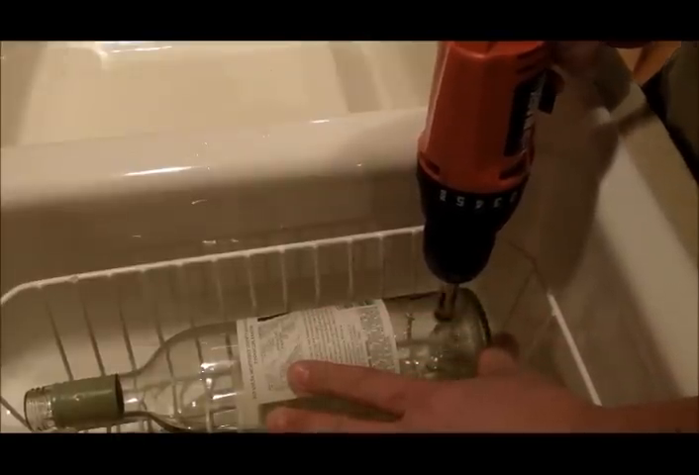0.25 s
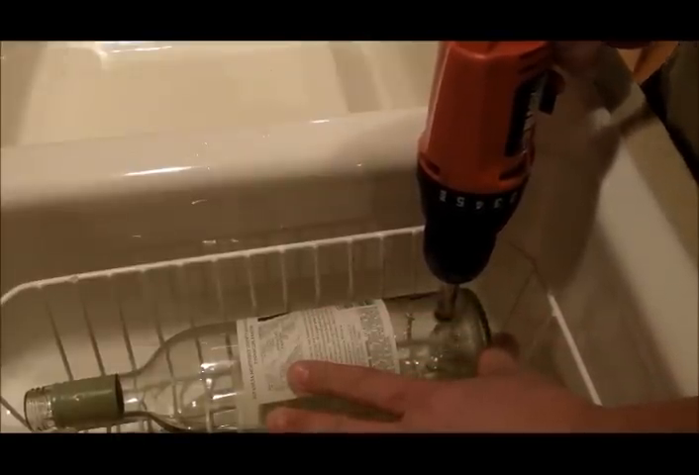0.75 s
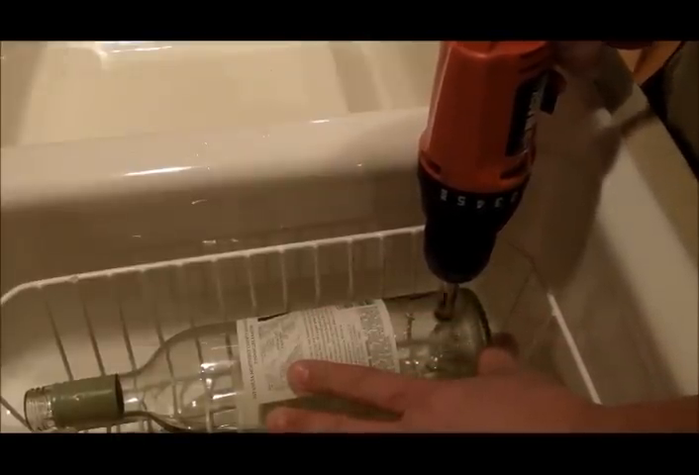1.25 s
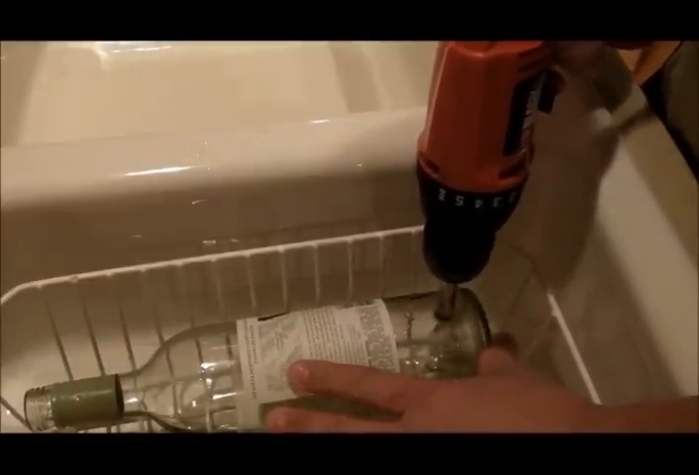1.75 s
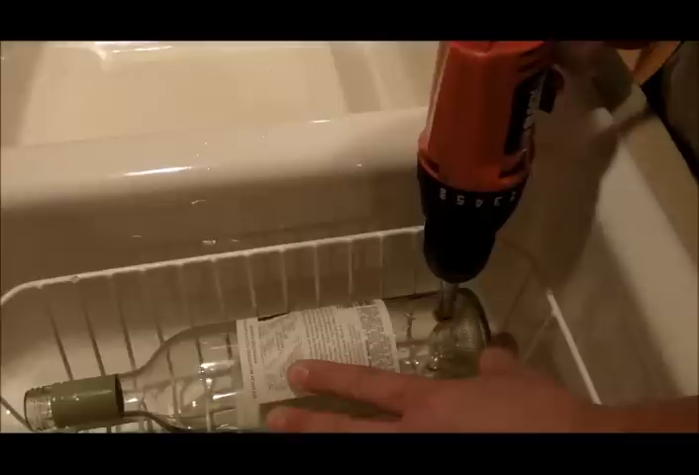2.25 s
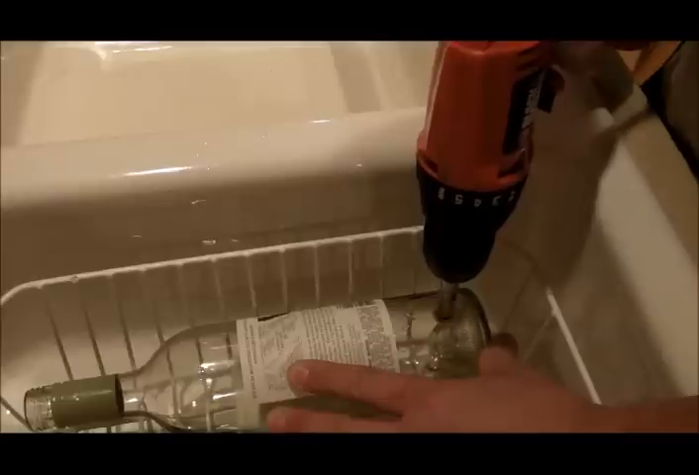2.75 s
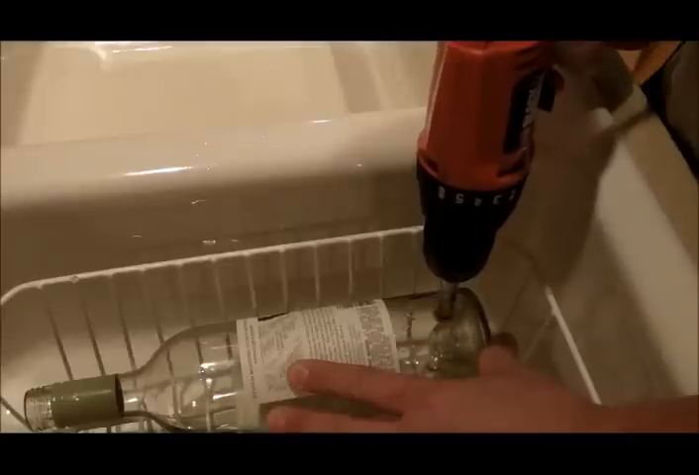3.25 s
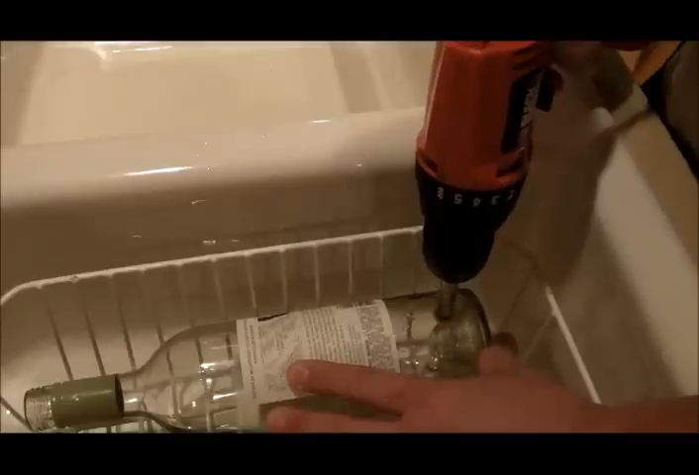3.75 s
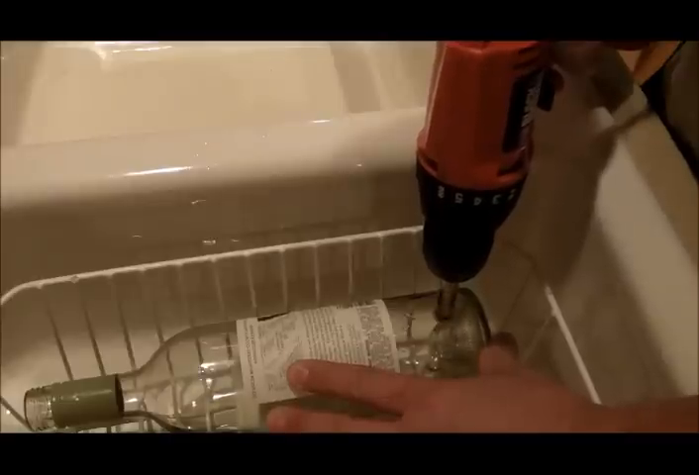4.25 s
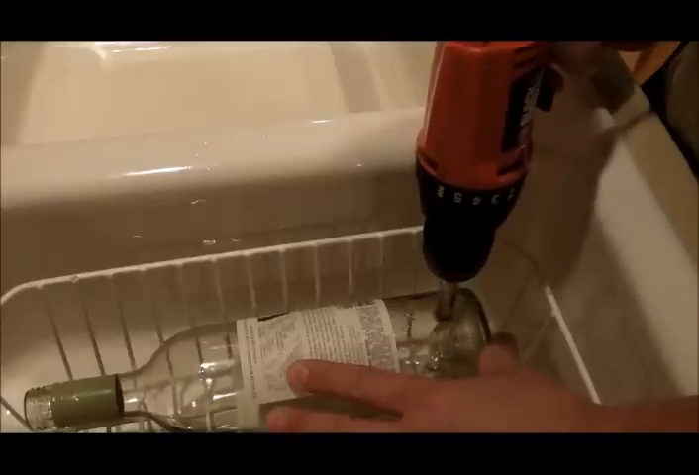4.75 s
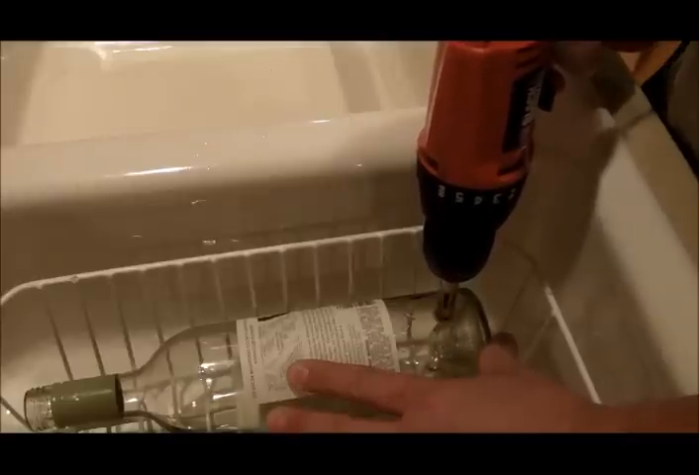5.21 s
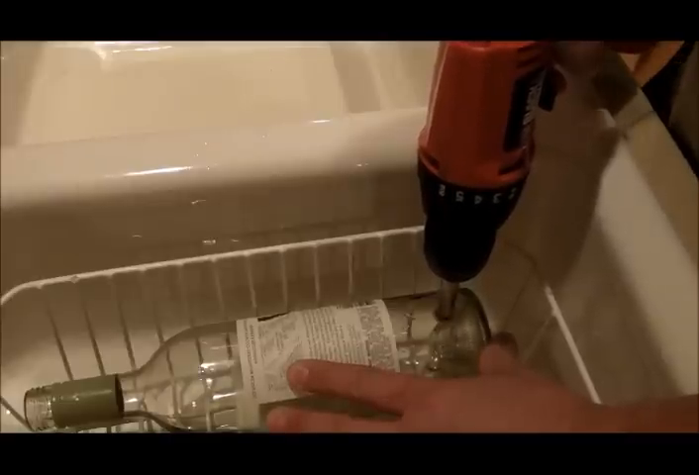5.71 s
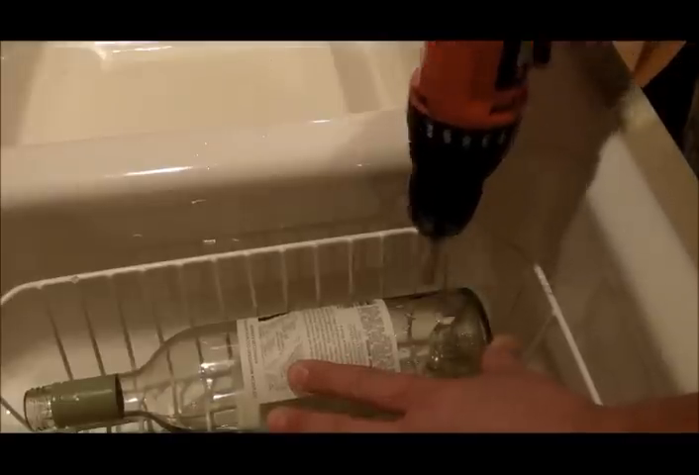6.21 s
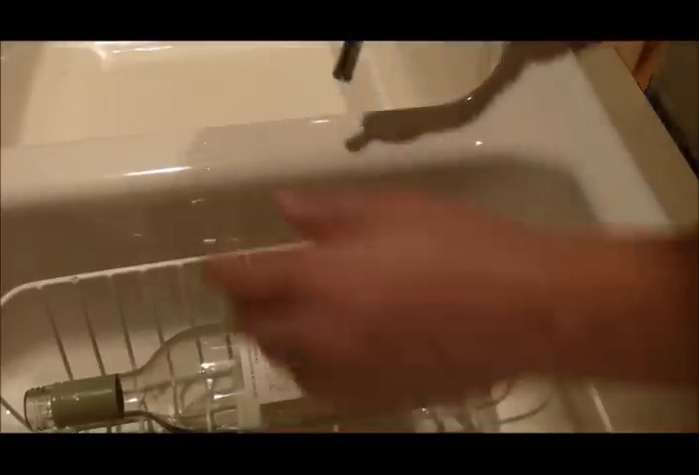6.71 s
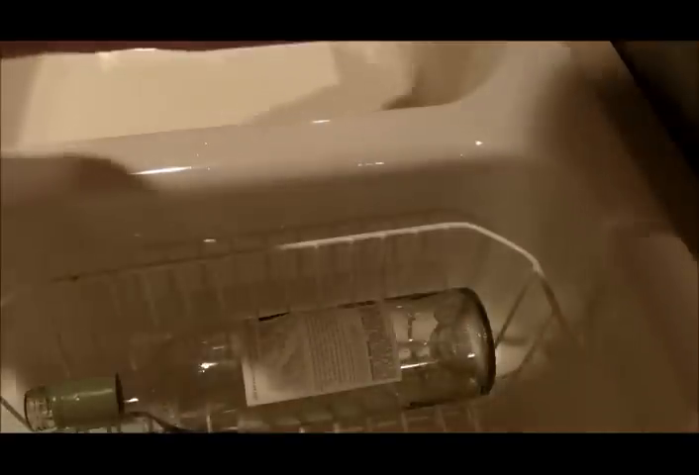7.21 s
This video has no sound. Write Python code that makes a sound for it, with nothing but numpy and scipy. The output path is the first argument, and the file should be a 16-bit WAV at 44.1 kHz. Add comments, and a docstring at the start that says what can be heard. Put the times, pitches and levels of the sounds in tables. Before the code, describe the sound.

Harsh, glassy grinding with a thin motor whine and short squeaks runs six seconds, cuts off to near silence, then light taps and water spray.

```python
"""Drill through a wet bottle

A cordless drill grinds a diamond bit into a wet glass bottle that lies in a plastic tub.
Grit noise rings bottle and tub resonances; sine tones make the thin motor whine, sagging under load.
Once the bit is through, small knocks (band noise bursts) lead to a tap spraying the tub (dense grains).
"""
import sys
import numpy as np
from scipy import signal
from scipy.fft import rfft, irfft, next_fast_len
from scipy.io import wavfile
from scipy.ndimage import uniform_filter1d, map_coordinates

SR = 44100
rng = np.random.default_rng(int(sys.argv[2]) if len(sys.argv) > 2 else 0)


def waveform_to_disk(signal):
    """Save audio, clipped to [-1, 1], as 16-bit WAV at the path in sys.argv[1]."""
    frames = np.transpose(np.atleast_2d(signal))
    scaled = np.clip(frames, -1, 1) * 32767
    samples = np.round(scaled).astype(np.int16)
    wavfile.write(sys.argv[1], SR, samples)


N = 329427
T = np.arange(N) / SR


def amp(db):
    """Decibels to gain."""
    return 10 ** (np.asarray(db) / 20)


def unit(x):
    """Scale to rms 1."""
    return x / np.sqrt(np.mean(x ** 2) + 1e-20)


def along(points, hz):
    """Read (freq_hz, value) points on a log frequency axis."""
    point_hz, value = np.transpose(points)
    return np.interp(np.log(hz + 1), np.log(point_hz + 1), value)


def curves(rows):
    """One value per sample for each column after time_s."""
    time_s, *columns = np.transpose(rows)
    return [np.interp(T, time_s, column) for column in columns]


def wobble(knots_hz):
    """Smooth random curve through knots_hz normal values a second."""
    knots = rng.standard_normal(int(N * knots_hz / SR) + 4)
    return map_coordinates(knots, [T * knots_hz])


def bell(x, centre, sigma):
    """Gaussian bump of height 1."""
    return np.exp(-.5 * ((x - centre) / sigma) ** 2)


def lift_db(resonances, hz):
    """Summed lift of (freq_hz, width_hz, lift_db) resonances at a frequency."""
    return sum(lift / (1 + (2 * (hz - f) / width) ** 2) for f, width, lift in resonances)


def filtered(x, response):
    """Multiply the spectrum of x by a function of frequency."""
    m = next_fast_len(N + SR // 2)
    return irfft(rfft(x, m) * response(np.fft.rfftfreq(m, 1 / SR)), m)[..., :N]


def coloured(x, spectrum, resonances=()):
    """Minimum-phase filter, rms 1 out: resonances on a broad spectrum ring on after each grain."""
    m = 2 * next_fast_len(N // 2 + SR // 4)
    hz = np.fft.rfftfreq(m, 1 / SR)
    db = along(spectrum, hz) + lift_db(resonances, hz)
    # folding the cepstrum makes the filter causal
    cepstrum = irfft(np.log(amp(db)), m)
    cepstrum[1:m // 2] *= 2
    cepstrum[m // 2 + 1:] = 0
    return unit(irfft(rfft(x, m) * np.exp(rfft(cepstrum)), m)[..., :N])


# Stereo balance: freq_hz, left_minus_right_db
BALANCE = [(60, 2), (110, 1), (200, 2.5), (380, -1), (700, 1), (1290, -0.5), (2380, 0.5), (4400, 2),
           (8120, 0.5), (15000, -2)]


def stereo(pair, alike):
    """Mix two unrelated signals to a left-right correlation per frequency; rms 1 in mono."""
    def mid_side_gain(hz):
        turn = np.arccos(np.clip(along(alike, hz), -1, 1)) / 2
        return np.array([np.cos(turn), np.sin(turn)])

    mid, side = filtered(pair, mid_side_gain)
    left_right = np.array([mid + side, mid - side])
    both = filtered(left_right, lambda hz: amp(np.outer([.5, -.5], along(BALANCE, hz))))
    return both / np.std(both.mean(axis=0))


def grains(rate_hz, spread_db):
    """Two streams, rms 1, of tiny simultaneous impacts of uneven size."""
    struck = rng.random(N) < rate_hz / SR
    size = amp(spread_db * rng.standard_normal(N))
    return unit(struck * size * rng.standard_normal((2, N)))


def tone(turns, order, waver_rad):
    """Sine of rms 1 at a multiple of the turns, with a restless phase."""
    phase = 2 * np.pi * (order * turns + rng.random())
    return np.sqrt(2) * np.sin(phase + waver_rad * wobble(45))


THROUGH_S = 6.0  # bit is through, motor silent
LOOSE_S = 5.85  # plug of glass gives way: no new turn of catches
GEAR_RATIO = 32.1  # motor turns per bit turn
START_TURNS = -.057  # bit angle at first
DRAG_HZ = .6  # motor speed swing in each turn of the uneven bit
# Mean motor speed, sagging under load: time_s, speed_hz
MOTOR_SPEED = [(0, 154.1), (.55, 154.1), (.72, 160), (.9, 163.3), (1.35, 165.7), (2, 163.8), (2.6, 160.8),
               (4, 161.5), (4.4, 160.6), (4.8, 162), (5.25, 159.8), (5.45, 160.7), (5.72, 160.2),
               (5.85, 155.5), (6, 148)]


def drill():
    """Load varies as the uneven bit turns, bending the motor pitch; glass outlasts the motor."""
    mean_speed_hz, = curves(MOTOR_SPEED)
    angle = START_TURNS + np.cumsum(mean_speed_hz) / SR / GEAR_RATIO
    speed_hz = mean_speed_hz + DRAG_HZ * np.cos(2 * np.pi * angle) + 0.1495 * wobble(8)
    turns = np.cumsum(speed_hz) / SR
    running = np.clip((THROUGH_S - T) / 0.037, 0, 1)
    ringing = np.clip((6.2 - T) / 0.16, 0, 1)
    glass = ringing * grinding(angle) + singing()
    catches = squeaks(angle, sigma_s=0.0069, fall_per_s=0.61, waver_rad=1.7)
    return glass + running * motor(speed_hz, turns) + catches


# Bands that swell once per bit turn: angle_turns, freq_hz, sigma_hz, swing_db
BIT_BANDS = [(.12, 4950, 200, 1), (.2, 4000, 201.8, 3.5), (.27, 10400, 600, 6), (.33, 14600, 400, 1),
             (.47, 6900, 200, 4.5), (.6, 3480, 600, 3), (.62, 4340, 198, 2), (.7, 13100, 800, 0),
             (.75, 7300, 160, 10.5), (.76, 6000, 250, 3), (.97, 5800, 250, 4.5)]
# Colour shift as the plug of glass comes loose: freq_hz, lift_db
LOOSE_COLOUR = [(50, 2), (110, 19), (220, -1), (750, 6.5), (1000, 11.5), (1450, -4.5), (2300, 0.5),
                (3200, 5.5), (4500, 0), (15000, -3)]
# Grit spectrum: freq_hz, relative_db_per_hz
GRIT_SPECTRUM = [(30, -44), (60, -31), (120, -16), (275, -15.5), (450, -3.5), (800, -5), (1900, 1),
                 (3800, -2), (5000, 1.5), (6300, 2.5), (7000, -11), (8300, -11), (11000, -4.5), (15500, -9)]
# Broad resonances of bottle and tub: freq_hz, width_hz, lift_db
BOTTLE_TUB = [(524, 110, 3), (1132, 260, 9), (1408, 270, 9.5), (1810, 380, -5), (2586, 118, 6.5),
              (2750, 135, -7.5), (5000, 36, 5.5), (9095, 220, 9), (11860, 300, 4.5)]
# Sharp glass modes and one dead band: freq_hz, width_hz, lift_db
GLASS_MODES = [(1250, 25, 4), (1865, 50, 4), (2280, 110, -20), (2487, 64, 13.5), (3042, 35, 9),
               (3581, 40, 4), (4686, 50, 3), (5856, 45, 4.5), (6112, 45, 7), (9995, 55, 4)]
# Grinding and gear rasp: freq_hz, left_right_correlation
DRILL_ALIKE = [(60, 0.42), (92, 0.92), (140, 0.83), (210, 0.76), (330, 1), (500, 0.94), (770, 0.92),
               (1170, 0.98), (1790, 1), (2740, 0.9), (4190, 0.6), (6410, 0.55), (9810, 0.64), (15000, 0.36)]


def grinding(angle):
    """Diamond grit chips the glass; chips excite its modes, coloured by the angle of the bit."""
    chips = grains(rate_hz=14000, spread_db=1.05) + 0.87 * rng.standard_normal((2, N))
    hz, t, z = signal.stft(chips * amp(0.51 * wobble(35)), SR, nperseg=512)

    loosening = np.interp(t, [5.72, 5.95, 6.06], [0, 1, 0])
    colour_db = np.outer(along(LOOSE_COLOUR, hz), loosening)
    for angle_turns, freq_hz, sigma_hz, swing_db in BIT_BANDS:
        facing = np.exp(7 * (np.cos(2 * np.pi * (angle - angle_turns)) - 1))
        facing = facing * (1 + 0.44 * wobble(5.15))
        swing = np.interp(t, T, facing - facing.mean())
        colour_db += swing_db * np.outer(bell(hz, freq_hz, sigma_hz), swing)
    # main ring flickers at random as the rim sticks and slips
    colour_db += np.outer(bell(hz, 2500, 130), np.interp(t, T, 1.5 * wobble(45) - .8))

    # slurry damps the contact in shifting patches
    patches = uniform_filter1d(rng.standard_normal(z.shape[1:]), size=5, axis=0)
    patches = unit(uniform_filter1d(patches, size=9, axis=1))
    force = signal.istft(z * amp(colour_db + 0.94 * patches), SR, nperseg=512)[1][:, :N]

    ring = stereo(coloured(force, GRIT_SPECTRUM, [*BOTTLE_TUB, *GLASS_MODES]), DRILL_ALIKE)
    fine = filtered(ring, lambda hz: hz > 7000)
    coarse = ring - fine
    coarse_db, fine_db = pressure(angle)
    return (amp(coarse_db) * coarse / np.std(coarse.mean(axis=0))
            + amp(fine_db) * fine / np.std(fine.mean(axis=0)))


SWAY_PER_TURN = .6  # three swells in five bit turns
SWAY_COARSE_DB, SWAY_FINE_DB = 0.11, 0.94
LOBE_DB, LOBE_TURNS = 0.15, 0.15  # two high spots on the rim: depth, angle of the first
SLIP_SIGMA_S = 0.012
# Steady contact, then break-through: time_s, coarse_grit_db, fine_grit_db
BITE_LEVELS = [(0, -24.5, -28.5), (5.75, -24.5, -28.5), (5.97, -28.5, -31), (6.02, -48, -53),
               (6.16, -60, -68)]
# Brief losses of grip: time_s, dip_db
GRIP_SLIPS = [(.185, -3), (3.11, -0.5), (5.145, -2.5)]


def pressure(angle):
    """Contact force sets coarse and fine grit dB: it sways with the bit and dips in slips."""
    coarse_db, fine_db = curves(BITE_LEVELS)
    sway = np.cos(2 * np.pi * SWAY_PER_TURN * angle)
    lobes_db = LOBE_DB * np.cos(2 * np.pi * 2 * (angle - LOBE_TURNS))
    shared_db = lobes_db + 0.13 * wobble(12)
    slip_db = sum(dip_db * bell(T, time_s, SLIP_SIGMA_S) for time_s, dip_db in GRIP_SLIPS)
    return (coarse_db + SWAY_COARSE_DB * sway + shared_db + slip_db,
            fine_db + SWAY_FINE_DB * sway + shared_db + 0.72 * wobble(16))


SING_HZ, SING_DB, SING_T60_S, SING_SWELL_DB = 2478, -43, 0.2, 5


def singing():
    """The bit keeps the bottle's main mode ringing in uneven swells; it decays after break-through."""
    decay_db = -60 * np.maximum(T - THROUGH_S, 0) / SING_T60_S
    level_db = SING_DB + SING_SWELL_DB * wobble(14) + decay_db
    return amp(level_db) * tone(SING_HZ * T, order=1, waver_rad=1.8)


HUM_DB, ARMATURE_DB = -66, -64  # shaft multiples 1 and 5, before case resonance
SWITCH_HZ = 9331  # speed controller whistle
# Motor tones, before case resonance: shaft_multiple, level_db
MOTOR_TONES = [(10, -42), (20, -47), (25, -63.5), (35, -42), (40, -62), (45, -49), (60, -55), (65, -56),
               (67, -60.5), (70, -61)]
# Drill case resonances that lift the tones: freq_hz, width_hz, lift_db
CASE_MODES = [(166, 6, 11), (795, 44, 24.5), (9660, 200, 6), (10785, 130, 11)]
# Gear rasp spectrum: freq_hz, relative_db_per_hz
GEAR_SPECTRUM = [(1500, -27), (5000, -5), (7000, 2), (9500, 7), (11000, -5.5), (15000, -14)]
# Gearbox resonances that ring the rasp: freq_hz, width_hz, lift_db
GEARBOX_MODES = [(7370, 280, 5), (10800, 200, 13)]


def motor(speed_hz, turns):
    """Shaft multiples swell near case resonances; plus a whistle and a gear rasp periodic in the turn."""
    def shaft_tone(order, level_db, swell_db, swell_hz, waver_rad):
        level_db = level_db + lift_db(CASE_MODES, order * speed_hz) + swell_db * wobble(swell_hz)
        return amp(level_db) * tone(turns, order, waver_rad)

    hum = shaft_tone(1, HUM_DB, swell_db=1.3, swell_hz=7, waver_rad=.15)
    armature = shaft_tone(5, ARMATURE_DB, swell_db=2.5, swell_hz=19, waver_rad=0.174)
    whine = sum(shaft_tone(round(multiple), level_db, swell_db=1.3, swell_hz=11, waver_rad=0.45)
                for multiple, level_db in MOTOR_TONES)
    whistle = amp(-56 + 2.5 * wobble(3.6)) * tone(SWITCH_HZ * T, order=1, waver_rad=0.45)

    teeth = rng.standard_normal((2, 256))  # one motor turn of noise
    rasp = np.array([map_coordinates(row, [turns % 1 * len(row)], mode="grid-wrap") for row in teeth])
    gears = amp(-38.5) * stereo(coloured(rasp, GEAR_SPECTRUM, GEARBOX_MODES), DRILL_ALIKE)
    return hum + armature + whine + whistle + gears


CATCH_SCATTER_TURNS, CATCH_DETUNE, CATCH_SCATTER_DB = .025, .015, 1.5  # std per catch
# Where the rim tends to catch: angle_turns, pitch_hz, peak_db, chance_0_to_1
RIM_CATCHES = [(.05, 5430, -27.5, .4), (.14, 4880, -25.5, .6), (.39, 4650, -31, 0.1), (.61, 4400, -31, .25),
               (.73, 6020, -28.5, .4)]


def squeaks(angle, sigma_s, fall_per_s, waver_rad):
    """Stick-slip at set rim angles in some turns: a brief, rough whistle that sinks in pitch."""
    out = np.zeros((2, N))
    flutter = waver_rad * wobble(260)
    for turn in range(int(np.interp(LOOSE_S, T, angle))):
        for angle_turns, pitch_hz, peak_db, chance in RIM_CATCHES:
            late, sharp, loud = rng.standard_normal(3)
            if rng.random() > chance:
                continue
            centre_s = np.interp(turn + angle_turns + CATCH_SCATTER_TURNS * late, angle, T)
            near = slice(max(0, round((centre_s - .04) * SR)), round((centre_s + .04) * SR))
            t = T[near] - centre_s
            catch_hz = pitch_hz * (1 + CATCH_DETUNE * sharp)
            phase = 2 * np.pi * catch_hz * (t - fall_per_s * t ** 2) + flutter[near]
            level = amp(peak_db + CATCH_SCATTER_DB * loud)
            out[:, near] += level * bell(t, 0, sigma_s) * np.sin(phase)
    return out


# Small knocks: start_s, level_db, pitch_hz, sigma_octaves, rise_s, t60_s
SMALL_KNOCKS = [(6.058, -45, 11500, 0.17, .003, .05), (6.056, -47.5, 3150, 0.099, 0.0027, 0.16),
                (6.953, -57, 2600, 0.21, .0007, .055), (7.114, -55, 7000, 1.6, .001, 0.14),
                (7.141, -47.5, 2500, 1.4, .0002, 0.023), (7.182, -58, 2500, 1, .0005, .03),
                (7.237, -46, 436, 0.14, 0.0053, .05), (7.25, -57, 600, .6, .008, 0.11),
                (7.259, -59, 5100, .15, .003, .05), (7.273, -56, 3600, 0.97, .001, .035),
                (7.333, -54, 280, 1.3, 0.003, 0.15)]


def knocks():
    """Light contacts: a tick and a ring as the bit leaves the glass, then knocks as the drill is put away and
    the tap gripped; each is decaying noise in one band."""
    out = np.zeros((2, N + SR))
    t = np.arange(SR // 4) / SR
    hz = np.fft.rfftfreq(2 * len(t), 1 / SR)
    for start_s, level_db, pitch_hz, sigma_octaves, rise_s, t60_s in SMALL_KNOCKS:
        band = bell(np.log2((hz + 1) / pitch_hz), 0, sigma_octaves)
        noise = rng.standard_normal((2, 2 * len(t)))
        mid, side = unit(irfft(rfft(noise) * band))[:, :len(t)]
        shape = (1 - np.exp(-t / rise_s)) * amp(-60 * t / t60_s)
        left_right = np.array([mid + .35 * side, mid - .35 * side])
        start = round(start_s * SR)
        out[:, start:][:, :len(t)] += amp(level_db) * shape / shape.max() * left_right
    return out[:, :N]


# Spray level as the tap opens: time_s, level_db
SPRAY_LEVEL = [(7.31, -70), (7.344, -52.5), (7.368, -54), (7.408, -39), (7.47, -36)]
# Spray spectrum: freq_hz, relative_db_per_hz
SPRAY_SPECTRUM = [(35, -48), (60, -19), (183, -8), (486, -31), (559, -9), (953, -14), (1150, -19),
                  (1320, -10.5), (5080, -3.5), (7200, -7), (13200, -3.5), (15500, -12)]
# Spray: freq_hz, left_right_correlation
SPRAY_ALIKE = [(200, .8), (1500, 0.96), (3000, .7), (5000, .25), (14000, .1)]


def tap():
    """Droplets hit the tub as dense coloured grains, louder overall as the tap opens."""
    opened = np.clip((T - 7.31) / 0.023, 0, 1)
    droplets = grains(rate_hz=8000, spread_db=1)
    spray = stereo(coloured(droplets, SPRAY_SPECTRUM), SPRAY_ALIKE)
    return opened * amp(curves(SPRAY_LEVEL)[0]) * spray


HISS_DB = -66
# Room hiss spectrum: freq_hz, relative_db_per_hz
HISS_SPECTRUM = [(15, -45), (25, -5), (119, -3.5), (246, -19), (433, -5), (741, -13), (1200, -12),
                 (1340, -16), (1490, -8), (1900, -12), (2920, -14.5), (5580, -12.5), (7300, -18),
                 (12800, -15), (15500, -23)]
# Hollow rush in the tub: time_s, level_db
RUSH_LEVEL = [(5.8, -56), (6, -47), (6.2, -57.5), (6.42, -55.5), (6.6, -62.5), (6.87, -63), (6.9, -77),
              (7.47, -57.5)]
# Tub rush spectrum: freq_hz, relative_db_per_hz
RUSH_SPECTRUM = [(60, -17), (260, -21), (335, -3.5), (395, 2), (470, -6.5), (600, -12.5), (1000, -21),
                 (1950, -21), (2180, -10.5), (2800, -21.5), (7000, -28.5), (15000, -31)]
# Hiss and rush: freq_hz, left_right_correlation
BACKGROUND_ALIKE = [(60, 0.85), (130, 0.68), (290, 0.99), (640, 0.8), (1410, 0.73), (3100, 0.64),
                    (6820, 0.35), (15000, 0.26)]


def background():
    """Steady room hiss, and tub-coloured noise that swells near 6 s, dies away and returns at the end."""
    hiss = stereo(coloured(rng.standard_normal((2, N)), HISS_SPECTRUM), BACKGROUND_ALIKE)
    rush = stereo(coloured(rng.standard_normal((2, N)), RUSH_SPECTRUM), BACKGROUND_ALIKE)
    return amp(HISS_DB) * hiss + amp(curves(RUSH_LEVEL)[0]) * rush


# Room decay: freq_hz, t60_s
ROOM_DECAY = [(200, 0.33), (2000, 0.13), (12000, 0.067)]


def room(x):
    """Small hard room as a decaying noise tail; treble dies first."""
    hz, t, z = signal.stft(rng.standard_normal((2, SR // 2)), SR, nperseg=256)
    decay = amp(-60 * t / along(ROOM_DECAY, hz)[:, None])
    tail = signal.istft(z * decay, SR, nperseg=256)[1]
    return signal.fftconvolve(x, tail / np.linalg.norm(tail[0]), axes=1)[:, :N]


def scene():
    """Close sources, a little of the room, and the background."""
    near = drill() + knocks() + tap()
    return near + amp(-17.0) * room(near) + background()


BASS_HZ, TOP_HZ = 50, 15850


def record(dry):
    """Second-order roll-off of the deepest bass; nothing from TOP_HZ up."""
    return filtered(dry, lambda hz: (hz < TOP_HZ) * hz ** 2 / np.sqrt(hz ** 4 + BASS_HZ ** 4))


dry = scene()
out = record(dry)
waveform_to_disk(out)
```